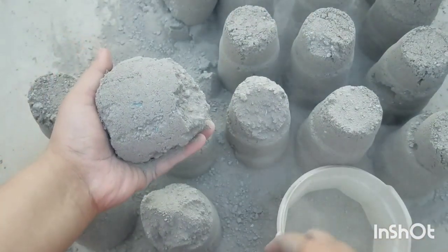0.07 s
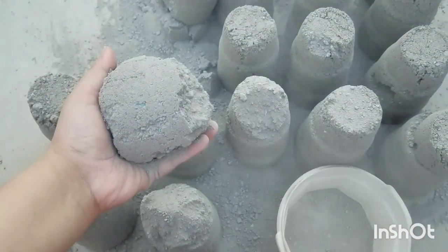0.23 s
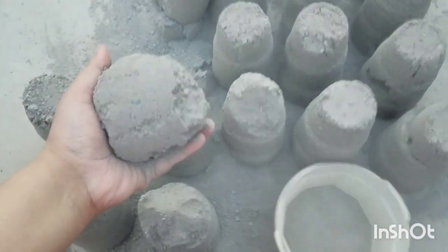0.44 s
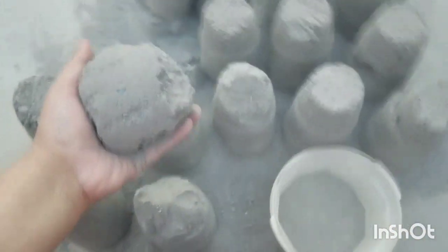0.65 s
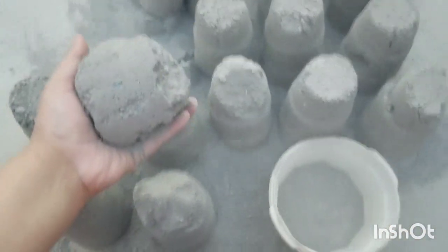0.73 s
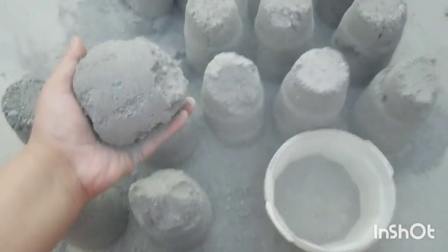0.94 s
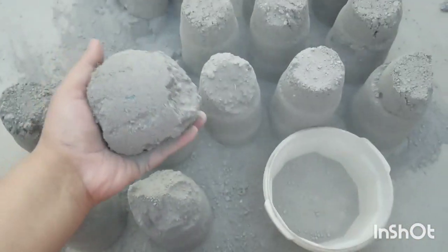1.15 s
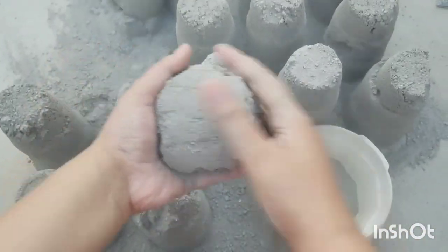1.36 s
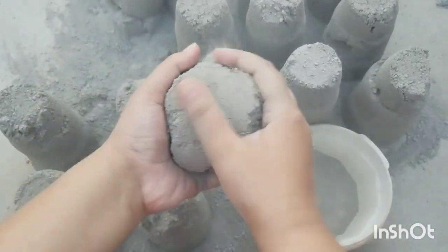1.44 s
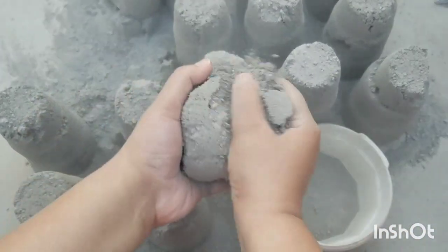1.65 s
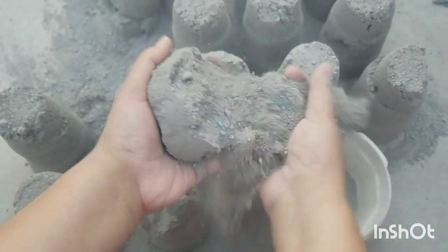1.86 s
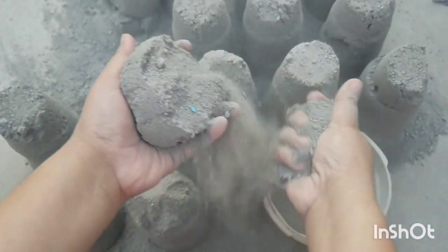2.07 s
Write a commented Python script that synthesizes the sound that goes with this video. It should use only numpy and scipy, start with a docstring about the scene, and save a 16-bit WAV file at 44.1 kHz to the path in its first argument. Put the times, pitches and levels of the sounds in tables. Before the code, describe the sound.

A finger rubs and judders on the camera from about 0.1 to 1 second, loud, muffled and overloading the right side, ending in soft bumps. From 1.3 seconds, hands squeeze a dry cement lump close by, with much quieter gritty crackling and a faint squeak near 1.65. Around 1.9 the crust snaps and crumbles, and loose pieces knock near 2.1. Low room rumble and faint hiss lie underneath.

```python
"""A finger rubs and judders over a hand-held camera's case, overloading the right microphone.
Then, close by, hands squeeze a lump of dry cement until it breaks: tiny fractures crackle as grit,
the tightening grip squeaks faintly, the crust snaps and loose pieces knock as the lump crumbles.
A low room rumble and a faint hiss lie underneath."""
import sys
import numpy as np
from scipy import signal
from scipy.fft import rfft, irfft, next_fast_len
from scipy.io import wavfile
from scipy.ndimage import map_coordinates

SR = 44100
rng = np.random.default_rng(int(sys.argv[2]) if len(sys.argv) > 2 else 0)


def transcribe(u):
    """Save the signal u as a 16-bit wav file named by the first command-line argument.

    u: samples, shape (n,) or (channels, n), limited to [-1, 1]; the rate is SR.
    q: integer samples, one column per channel.
    """
    v = np.clip(np.atleast_2d(u).T, -1, 1)
    q = np.round(v * 32767).astype(np.int16)
    wavfile.write(sys.argv[1], SR, q)


N = 92610

# Hollow ring of the lump in the hands. Each row: centre in Hz, width in Hz, gain in dB.
LUMP_MODES = [(1640, 84, 0.5), (2840, 500, 0.5), (7100, 330, -6.5)]
# Stereo image of the cement. Each row: frequency in Hz, left-right correlation.
CEMENT_CORRELATION = [(400, .6), (1500, .2), (2800, -.4), (5000, 0), (14000, .05)]


def amp(db):
    return 10 ** (np.asarray(db) / 20)


def unit_rms(x):
    return x / np.sqrt(np.mean(x ** 2) + 1e-20)


def log_interp(points, hz):
    """Interpolate (Hz, value) points on a log frequency axis."""
    knots_hz, values = np.transpose(points)
    return np.interp(np.log(hz + 1), np.log(knots_hz + 1), values)


def time_s():
    return np.arange(N) / SR


def envelope(points):
    """Gain per sample from (s, dB) points."""
    return amp(np.interp(time_s(), *np.transpose(points)))


def wobble(knots_per_s):
    """Smooth random curve."""
    return map_coordinates(rng.standard_normal(4000), [time_s() * knots_per_s], mode="wrap")


def filtered(x, response):
    """Apply a complex response, given as a function of Hz."""
    size = x.shape[-1]
    padded = next_fast_len(size + 8192)
    return irfft(rfft(x, padded) * response(np.fft.rfftfreq(padded, 1 / SR)), padded)[..., :size]


def coloured(x, spectrum):
    return filtered(x, lambda hz: amp(log_interp(spectrum, hz)))


def resonances(modes, hz):
    """Causal response of (Hz, width Hz, dB) modes of alternating sign."""
    return sum((-1) ** k * amp(db) * 1j * hz * width / (centre ** 2 - hz ** 2 + 1j * hz * width)
               for k, (centre, width, db) in enumerate(modes))


def stereo(pair, correlation):
    """Mix two independent signals to a left-right correlation, rms 1."""
    def weights(hz):
        angle = np.arccos(np.clip(log_interp(correlation, hz), -1, 1)) / 2
        return np.array([np.cos(angle), np.sin(angle)])
    mid, side = filtered(pair, weights)
    return unit_rms(np.array([mid + side, mid - side]))


def pan(left_over_right_db):
    return amp(np.array([[left_over_right_db], [-left_over_right_db]]) / 2)


def add(out, start_s, x):
    part = out[..., round(start_s * SR):][..., :x.shape[-1]]
    part += x[..., :part.shape[-1]]


def room(crossover_hz=417):
    """Low, nearly mono rumble under a faint wash of air and treble hiss."""
    # Each row: frequency in Hz, level in dB.
    room_spectrum = [(15, -50.5), (25, -24), (64, -7.5), (97, -5.5), (133, 2.5), (226, -16.5), (248, -15.5),
                     (298, -14), (366, -15.5), (392, -25), (711, -32), (915, -29.5), (1100, -35.5),
                     (1740, -35.5), (6000, -55.5), (7800, -81.5), (13200, -120)]
    hiss_spectrum = [(2000, -20.5), (4000, -17.5), (7500, -5.5), (9500, -7), (12000, -2), (15500, 0)]
    # Each row: frequency in Hz, left-right correlation.
    correlation = [(50, 0.86), (200, 0.98), (1000, 0.23), (3000, 0.13), (12000, .1)]
    # Each row: time in seconds, level in dB.
    rumble_levels = [(0, -31), (.2, -32), (.4, -31.5), (1.0, -39.5), (1.1, -35.5), (1.45, -38),
                     (1.65, -33.5), (1.82, -29.5), (2.1, -33.5)]
    air_levels = [(0, -43.5), (.3, -47), (.5, -48.5), (.95, -54), (1.2, -53), (1.6, -48.5), (2.1, -43)]
    hiss_levels = [(0, -51.5), (.38, -56.5), (.58, -61), (.9, -68.5), (.96, -64), (1.0, -53.5),
                   (1.06, -62.5), (1.3, -64), (2.1, -56.5)]
    noise = stereo(coloured(rng.standard_normal((2, N)), room_spectrum), correlation)
    lows = filtered(noise, lambda hz: 1 / (1 + (hz / crossover_hz) ** 6))
    rumble = unit_rms(lows) * envelope(rumble_levels)
    air = unit_rms(noise - lows) * envelope(air_levels)
    hiss = unit_rms(coloured(rng.standard_normal((2, N)), hiss_spectrum)) * envelope(hiss_levels)
    return rumble + air + hiss


def finger_rub(flutter_db=2.5):
    """Skin rubs lightly on the case: dull, fluttering noise."""
    # Each row: time in seconds, level in dB.
    levels = [(.11, -64), (.122, -25.5), (.155, -27.5), (.17, -30), (.198, -36.5), (.208, -18), (.224, -9),
              (.245, -11), (.256, -23.5), (.265, -33.5), (.309, -34.5), (.318, -4.5), (.5, -22),
              (.66, -7.5), (.76, -24.5), (.79, -23), (.84, -15), (.875, -46), (.94, -43.5), (.975, -25),
              (.995, -23), (1.03, -30.5), (1.06, -61)]
    # Each row: frequency in Hz, level in dB.
    spectrum = [(30, -16.5), (130, -6), (240, 2), (400, -3), (520, -1), (720, -11.5), (900, -4.5),
                (1150, -19.5), (1700, -27), (2800, -45), (6000, -69), (16000, -96)]
    friction = rng.standard_normal(N) * amp(flutter_db * wobble(150))
    return unit_rms(coloured(friction, spectrum)) * envelope(levels)


def finger_drags(attack_s=0.0019, release_s=0.0067):
    """Stick-slip: uneven trains of slips shake the case's modes, and the pressure flexes it."""
    # Each row: start in seconds, length in seconds, level in dB, slips per second, roughness 0-1.
    drags = [(0.232, 0.015, -4.5, 320, .05), (0.3114, 0.049, 4, 250, 0.63), (0.363, 0.016, -1, 250, 0.8),
             (0.389, 0.0028, 8, 191, 0.31), (0.415, .030, 6, 228, .3), (0.452, .057, 5, 212, 0.3),
             (0.511, 0.019, -0.5, 345, 0.4), (0.533, 0.021, -1, 210, 0.5), (0.554, 0.0146, 6, 245, .15),
             (0.576, 0.031, 1, 215, .15), (0.618, 0.013, -2.5, 330, .7), (0.64, 0.0057, -1, 250, 0),
             (0.685, 0.015, 3, 195, 0.3), (0.705, .027, 2, 245, .2), (0.753, 0.0088, 3.5, 248, 0.54),
             (0.832, 0.016, 0, 293, 0.19), (0.844, 0.018, 4.5, 168, .05)]
    # Each row: centre in Hz, width in Hz, gain in dB.
    case_modes = [(132, 82, -12), (232.6, 101.5, 1), (317.7, 111.4, -4.5), (463, 154, -10.5),
                  (627, 280, -23), (855, 120, -15), (1330, 1200, -39)]
    rate_wander, slip_spread_db, noise_gain = 0.13, 3.16, 1.96
    flex_hz, flex_db = 90.6, -8.5
    t, out = np.arange(SR // 8) / SR, np.zeros(N)
    for start_s, length_s, db, slips_per_s, roughness in drags:
        cycles = np.cumsum(slips_per_s * np.exp(rate_wander * wobble(110)[:t.size])) / SR
        slips = np.diff(np.floor(cycles), prepend=-1) * amp(slip_spread_db * wobble(200)[:t.size])
        force = unit_rms(slips) + noise_gain * roughness * rng.standard_normal(t.size)
        skin_hz = 1460 * (0.24 + roughness)  # soft skin excites little above this
        shake = filtered(force, lambda hz: resonances(case_modes, hz) / (1 + 1j * hz / skin_hz) ** 3)
        pressure = rng.standard_normal(t.size)
        flex = unit_rms(filtered(pressure, lambda hz: resonances([(flex_hz, 100, 0)], hz) ** 2))
        shape = np.clip(t / attack_s, 0, 1) * np.exp(-np.maximum(t - length_s, 0) / release_s)
        shake /= np.sqrt(np.average(shake ** 2, weights=shape ** 2))
        add(out, start_s, amp(db) * shape * (shake + amp(flex_db) * flex))
    return out


def finger_bumps(attack_s=0.00044):
    """Each soft fingertip bump leaves one short, low ring in the case."""
    # Each row: start in seconds, level in dB, ring in Hz, T60 in seconds.
    bumps = [(0.665, -8.5, 240, .03), (.669, 2.5, 230, 0.044), (0.7421, 3, 239, 0.018),
             (0.747, 6, 242, 0.023), (0.774, 1, 223, 0.032), (0.7811, 2.5, 216.6, 0.06),
             (0.8061, -1, 473, 0.009), (0.814, 1.5, 223, .04), (.889, 7.5, 222, 0.028),
             (0.901, 0, 162, 0.054), (0.9259, -1.5, 188.4, 0.061), (0.9492, -8, 491, 0.038)]
    t, out = np.arange(SR // 8) / SR, np.zeros(N)
    for start_s, db, hz, t60_s in bumps:
        shape = np.exp(-np.log(1000) * t / t60_s) * (1 - np.exp(-t / attack_s))
        add(out, start_s, amp(db) * shape * np.sin(2 * np.pi * hz * t))
    return out


def finger(left_lead_s=0.00016):
    """Handling noise at the right microphone; a little reaches the left through the case, just ahead."""
    # Leak to the left. Each row: frequency in Hz, gain in dB.
    leak = [(40, -18), (220, -24), (480, -19), (750, -34), (1500, -21.5), (8000, -24)]
    right = finger_rub() + finger_drags() + finger_bumps()
    left = filtered(right, lambda hz: amp(log_interp(leak, hz)) * np.exp(2j * np.pi * hz * left_lead_s))
    return np.array([left, right])


def squeaks(jitter_rad=2.0):
    """The tightening grip squeaks: thin, gliding tones with a rough phase."""
    # Each row: start in seconds, length in seconds, start pitch in Hz, end pitch in Hz, level in dB.
    glides = [(1.631, 0.017, 4300, 4450, -46), (1.641, 0.042, 4400, 3580, -44),
              (1.673, 0.042, 4400, 3830, -44)]
    t, out = time_s(), np.zeros(N)
    for start_s, length_s, start_hz, end_hz, db in glides:
        progress = np.clip((t - start_s) / length_s, 0, 1)
        phase = 2 * np.pi * np.cumsum(start_hz + (end_hz - start_hz) * progress) / SR
        out += amp(db) * np.sin(np.pi * progress) * np.sin(phase + jitter_rad * wobble(900))
    return out


def cement(pair, ring_db=0):
    """Give a noise pair the colour of breaking cement and the lump's hollow ring."""
    # Each row: frequency in Hz, level in dB.
    grit_spectrum = [(240, -33.5), (400, 6.5), (553, -31.5), (598, 6.5), (697, -12), (814, -11),
                     (1040, -2.5), (1290, -7), (1710, 0.5), (2050, -4.5), (2750, 3), (4110, -2.5),
                     (5870, -3), (6850, -6.5), (7630, -2), (9920, -9.5), (10900, -2.5), (13500, -2),
                     (16000, -0.5)]

    def response(hz):
        ring = amp(ring_db) * abs(resonances(LUMP_MODES, hz)) ** 2
        return amp(log_interp(grit_spectrum, hz)) * (1 + ring)
    return stereo(filtered(pair, response), CEMENT_CORRELATION)


def grinding(grains_per_s=900, grain_s=0.0007, spread_db=-1.5, powder_db=-9):
    """Countless tiny fractures over a hiss of running powder."""
    # How hard the cement is ground. Each row: time in seconds, level in dB.
    levels = [(1.31, -65.5), (1.35, -47.5), (1.41, -60), (1.47, -58.5), (1.51, -47.5), (1.6, -46.5),
              (1.69, -43), (1.78, -37.5), (1.81, -46), (1.865, -46.5), (1.895, -35), (1.92, -32.5),
              (1.935, -32.5), (1.975, -26), (2.03, -33.5), (2.06, -32.5), (2.1, -46)]
    onsets = rng.random(N) < grains_per_s / SR
    sizes = onsets * amp(spread_db * np.minimum(rng.exponential(size=N), 4))
    energy = signal.lfilter([1], [1, -np.exp(-2 / (grain_s * SR))], sizes ** 2)
    crackle = rng.standard_normal((2, N)) * (unit_rms(np.sqrt(energy)) + amp(powder_db))
    return cement(crackle, ring_db=-14.5) * envelope(levels)


def short_noise():
    return rng.standard_normal((2, 4096))


def ringing(modes):
    """Stereo noise through the modes of a cement piece."""
    return stereo(filtered(short_noise(), lambda hz: abs(resonances(modes, hz)) ** 2), CEMENT_CORRELATION)


def burst(noise, decay_s, attack_s=0.0004, tail_db=-22, tail_s=0.0051):
    """Shape noise into a sudden crack; the faint tail is the floor's answer."""
    t = np.arange(noise.shape[-1]) / SR
    shape = (np.exp(-t / decay_s) + amp(tail_db) * np.exp(-t / tail_s)) * (1 - np.exp(-t / attack_s))
    shape /= shape.max()
    power = np.average(np.mean(noise ** 2, axis=0), weights=shape ** 2)
    return noise * shape / np.sqrt(power)


def piece_knocks():
    """Larger loose pieces knock together: a dull ring with a gritty edge."""
    # Each row: start in seconds, level in dB, decay in seconds, edge gain in dB.
    knocks = [(1.7697, -29.5, .002, -14), (2.088, -24, .006, 1.5)]
    # Each row: centre in Hz, width in Hz, gain in dB.
    piece_modes = [(1010, 260, 4.5), (1540, 340, 8.5), (2810, 720, -8)]
    out = np.zeros((2, N))
    for start_s, db, decay_s, edge_db in knocks:
        edge = burst(cement(short_noise()) + ringing(LUMP_MODES), decay_s)
        body = burst(ringing(piece_modes), decay_s)
        add(out, start_s, amp(db) * (body + amp(edge_db) * edge))
    return out


def crust_snaps(pivot_hz=3000, ring_decay_s=0.004):
    """The crust snaps sharply; deeper snaps ring the lump more."""
    # Each row: start in seconds, level in dB, decay in seconds, tilt in dB/octave, leftward pan in dB.
    snaps = [(1.509, -39, .001, 3, 0), (1.533, -30, .0012, 3, 0), (1.550, -31, .0015, 3, 0),
             (1.571, -31, .002, 2, 0), (1.617, -29, .0016, 2, 0), (1.672, -32, .002, 0, 0),
             (1.680, -34, .0015, 0, 0), (1.7045, -27, .002, -1, 0), (1.713, -31, .001, 3, 0),
             (1.750, -31, .001, 3, 0), (1.891, -21, .002, 2, 0), (1.909, -31, .002, 0, 0),
             (1.927, -28, .003, -2, 0), (1.935, -15.5, .0017, -2, 3), (1.949, -17.5, .002, 0, 2),
             (1.9915, -21.5, .002, -2, 2), (2.0135, -24, .0015, 0, 0), (2.0195, -26, .0014, 1, 0),
             (2.031, -25, .0015, 0, 0), (2.0375, -19, .0016, 2, 0)]
    out = np.zeros((2, N))
    for start_s, db, decay_s, tilt, pan_db in snaps:
        crack = filtered(cement(short_noise()), lambda hz: amp(tilt * np.log2(hz / pivot_hz + 0.01)))
        ring_db = -14 - 2 * tilt
        ring = amp(ring_db) * burst(ringing(LUMP_MODES), ring_decay_s)
        add(out, start_s, amp(db) * pan(pan_db) * (burst(crack, decay_s) + ring))
    return out


def scene():
    """Finger on the right, crumbling lump slightly left, room behind."""
    handling = finger()
    crumbling = grinding() + crust_snaps() + piece_knocks()
    return handling + pan(2.5) * crumbling + squeaks() + room()


def record(dry):
    """Hard overload, then a brick-wall low-pass."""
    ceiling, top_hz = 0.97, 16000
    return filtered(np.clip(dry, -ceiling, ceiling), lambda hz: hz < top_hz)


dry = scene()
out = record(dry)
transcribe(out)
```